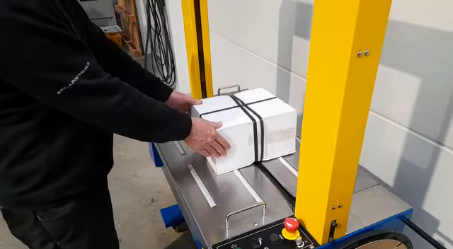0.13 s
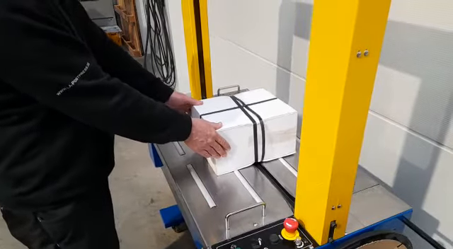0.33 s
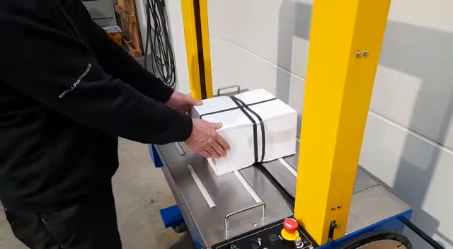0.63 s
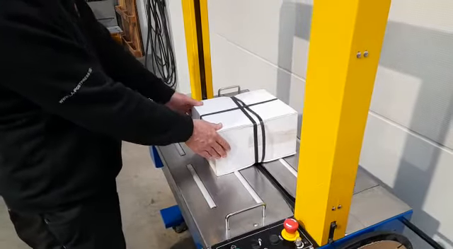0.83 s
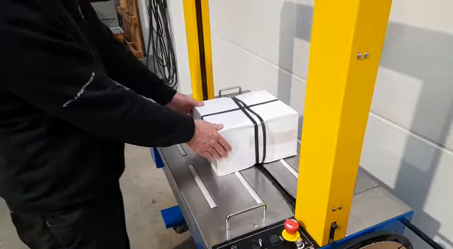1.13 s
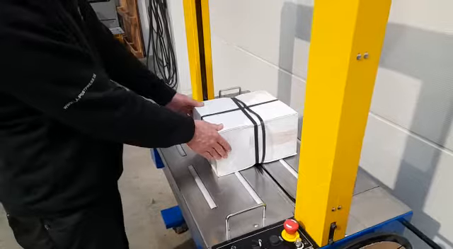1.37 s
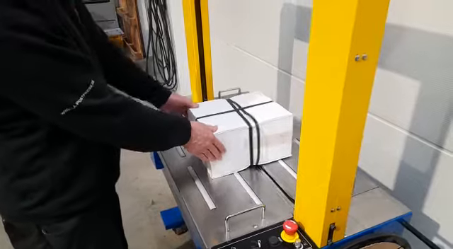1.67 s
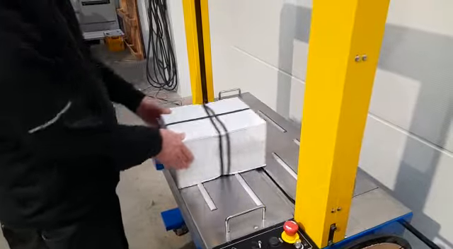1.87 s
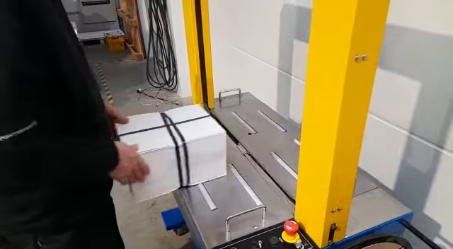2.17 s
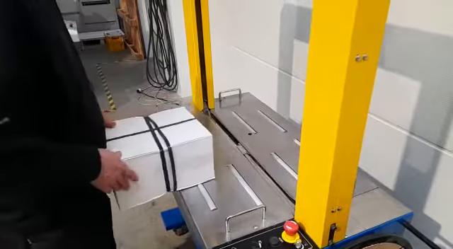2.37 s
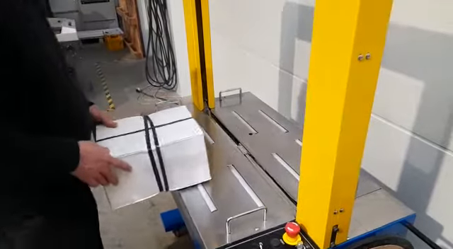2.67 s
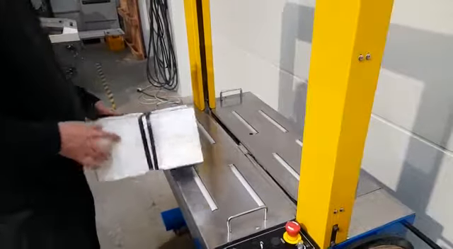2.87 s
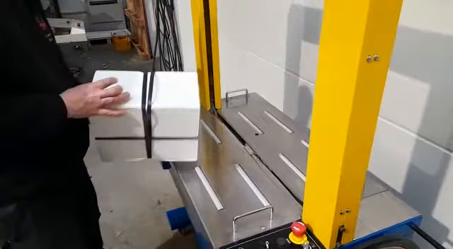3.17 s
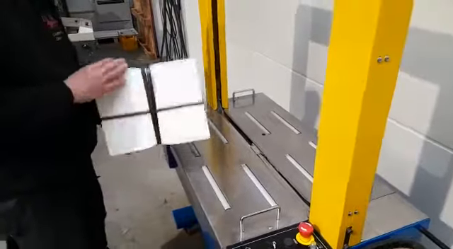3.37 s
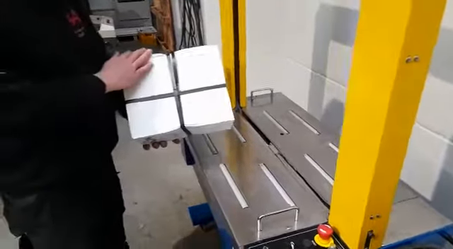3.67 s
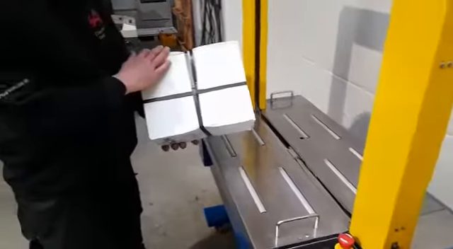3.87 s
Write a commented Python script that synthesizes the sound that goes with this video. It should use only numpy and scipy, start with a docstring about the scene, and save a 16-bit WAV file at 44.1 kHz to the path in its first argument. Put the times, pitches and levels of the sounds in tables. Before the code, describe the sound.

Close phone pickup of a strapping machine ending its cycle: cams and clamps clack, strap hisses and squeals, then feed wheels whir in rising, jittery surges while plastic strap ticks along guides, with workshop echo.

```python
"""A hard-walled workshop, where a strapping machine ends its cycle a metre or two from a phone.
Cams and clamps clack (noise bursts, ringing frame modes) over a gear rumble (wandering coloured noise);
the strap squeals while it is drawn tight (a sinking, wavering harmonic tone in hiss); then the feed wheel
whirs new strap through the arch in surges (a jittery tone coloured by resonances) while the strap end
ticks along the guides (noise bursts). Short metallic rings, workshop air, hum and an echo tail surround it."""
import sys
import numpy as np
from scipy import signal
from scipy.fft import rfft, irfft
from scipy.io import wavfile
from scipy.ndimage import uniform_filter1d, map_coordinates

SR = 44100
rng = np.random.default_rng(int(sys.argv[2]) if len(sys.argv) > 2 else 0)


def wav_out(sig):
    """Save sig, one row per channel (or a flat mono array), as 16-bit PCM at SR to the path in sys.argv[1]."""
    wavfile.write(sys.argv[1], SR, np.round(np.clip(np.atleast_2d(sig).T, -1, 1) * 32767).astype(np.int16))


N = 176400

# Surges of the feed wheels: time_s, whir_db, pitch_hz
FEED_SURGES = [(2.41, -42, 562), (2.445, -26, 677), (2.485, -21.5, 1003), (2.55, -34, 1147),
               (2.68, -50, 750), (2.71, -30, 638.5), (2.79, -32, 622.8), (2.835, -43, 600.6),
               (2.95, -25.5, 680), (2.99, -24, 960), (3.09, -30, 800), (3.15, -38, 649.2),
               (3.2, -29.5, 616), (3.265, -17.5, 983), (3.33, -18, 1080), (3.4, -25.5, 951),
               (3.46, -25, 761), (3.49, -19, 742.6), (3.57, -15.5, 1010), (3.65, -23.5, 1145),
               (3.72, -19, 1010), (3.76, -17, 920), (3.85, -23.5, 1000), (3.92, -23, 1205),
               (4, -18.5, 1296)]


def undb(db):
    """Level to amplitude: 20 dB is a factor of ten."""
    return 10 ** (np.asarray(db) / 20)


def curve(table, axis):
    """Piecewise-linear control: one column of a table interpolated over its times."""
    table = np.array(table)
    return np.interp(np.arange(N) / SR, table[:, 0], table[:, axis])


def unit(x):
    """Normalization to a root-mean-square value of one."""
    return x / np.sqrt(np.mean(x ** 2))


def shape(x, points):
    """Spectral colouring: gains interpolated over log frequency, falling 24 dB per octave outside."""
    hz = np.maximum(np.fft.rfftfreq(x.shape[-1], 1 / SR), 1)
    point_hz, point_db = np.array(points).T
    octaves_below = np.maximum(np.log2(point_hz[0] / hz), 0)
    octaves_above = np.maximum(np.log2(hz / point_hz[-1]), 0)
    gain_db = np.interp(np.log(hz), np.log(point_hz), point_db) - 24 * (octaves_below + octaves_above)
    return irfft(rfft(x) * undb(gain_db), x.shape[-1])


def pair(mid, other):
    """Interchannel coherence: left and right alike in the bass, apart in the treble."""
    alike_hz = 1420
    side = signal.lfilter(*signal.butter(1, alike_hz, "high", fs=SR), other)
    return np.array([mid + side, mid - side])


def hiss(points):
    """Extended source: coloured stereo noise, as from many spots spread across the machine."""
    return unit(shape(pair(*rng.standard_normal((2, N))), points))


def walk(rate_hz):
    """Slow random modulation: held random levels smoothed twice, with a spread near 1."""
    hold = int(SR / rate_hz)
    steps = np.repeat(rng.standard_normal(N // hold + 1), hold)
    return 1.2 * uniform_filter1d(uniform_filter1d(steps, hold), hold)[:N]


def bursts(times_s, levels_db, t60s_s, rises_s):
    """Impact envelopes: exponential rise and decay, overlapping blows adding in power."""
    power = np.zeros(N)
    for start_s, level_db, t60_s, rise_s in np.broadcast(times_s, levels_db, t60s_s, rises_s):
        i = int(start_s * SR)
        t = np.arange(min(N - i, SR // 2)) / SR
        blow = undb(level_db - 60 * t / t60_s) * (1 - np.exp(-t / rise_s))
        power[i:i + len(t)] += blow ** 2
    return np.sqrt(power)


def shop():
    """Ambient noise: wandering broadband air noise, with mains hum and a higher tone as sinusoids."""
    # Spectrum of the air noise: frequency_hz, density_db (per Hz)
    air_tone = [(40, -9), (65, -12.5), (180, -6.5), (389, -9.5), (848, -19.5), (1620, -36), (2770, -31),
                (15600, -41.5)]
    # Steady pitches of wandering level: pitch_hz, level_db
    hum_tones = [(100, -54), (1641, -57)]
    t = np.arange(N) / SR
    hum = sum(undb(db + 3.9 * walk(9)) * np.sin(2 * np.pi * hz * t) for hz, db in hum_tones)
    air_db = -48 + 1.02 * walk(4.253)
    return undb(air_db) * hiss(air_tone) + hum


def room():
    """Diffuse reverberation: an impulse response of noise, each octave dying at its own rate."""
    # Reverberation time of the workshop: frequency_hz, t60_s
    reverberation = [(100, 0.55), (1000, 0.88), (5000, 0.64), (15000, 0.15)]
    point_hz, point_t60_s = np.array(reverberation).T
    t = np.arange(SR) / SR
    fade_in = np.clip(t / 0.0006, 0, 1)
    tails = 0
    for hz in 60 * 2. ** np.arange(9):
        t60_s = np.interp(np.log(hz), np.log(point_hz), point_t60_s)
        band = shape(rng.standard_normal((2, SR)), [(hz / 1.3, 0), (hz * 1.245, 0)])
        decay_energy = t60_s * SR / np.log(1e6)
        tails = tails + band * undb(-60 * t / t60_s) * fade_in / np.sqrt(decay_energy)
    return pair(tails[0], tails[1])


def gears():
    """Amplitude-modulated noise: the drive rumbles unevenly while the cam shaft turns."""
    # Course of the rumble: time_s, level_db
    rumble = [(0, -49), (.33, -41.5), (.45, -37.5), (.85, -38.5), (1.02, -50.5), (1.25, -38), (1.7, -32),
              (2.3, -43), (4, -40.5)]
    # Spectrum of the rumble: frequency_hz, density_db (per Hz)
    rumble_tone = [(57, -5), (140, -8), (215, 3.5), (300, -2.5), (400, -10.5), (570, -6), (900, -12),
                   (1620, -17.5), (2400, -25.5), (4500, -30)]
    return undb(curve(rumble, axis=1) + 2.73 * walk(11)) * hiss(rumble_tone)


def clacks():
    """Impact and modal response: a bright crack, a rattle of the sheet-metal frame and a low thump."""
    # Blows of cams and clamps: start_s, level_db, thump_db and body_db (both re level), treble_t60_s, rise_ms
    blows = [(0.1425, -35.5, -16, 1.5, 0.14, 0.36), (0.182, -22, -15, -4.5, 0.039, 0.12),
             (0.401, -17.5, -18, -2, 0.12, 17), (0.515, -18.5, -21, 0.5, 0.16, 22),
             (0.665, -36.5, -11, -8, 0.11, 5.9), (0.852, -44, -14, -1, 0.059, 1.7),
             (0.9774, -36.5, -9, 0.5, 0.063, 1.1), (1.2484, -49, -23, 16, 0.071, .7),
             (1.267, -37, 9, 4, 0.049, 0.99), (1.298, -31.5, 9, 6.5, 0.38, 7.4),
             (1.3324, -15, -1, -5, 0.055, 0.25), (1.369, -22, -15, -28, 0.12, 0.3),
             (1.466, -32, 10, 4.5, 0.1, 5.9), (1.5473, -8.5, -17, -3.5, 0.09, 12.7),
             (2.045, -11, -15, -13.5, 0.064, 3.1)]
    # Resonances of the frame: frequency_hz, level_db, t60_s
    frame_modes = [(606.5, 11, 0.42), (1664, 14.5, 0.1), (2250, 12, 0.033)]
    # Spectrum of the crack: frequency_hz, density_db (per Hz)
    crack_tone = [(1750, -5), (2940, -14), (3530, -7.5), (6340, -11), (14100, -12.5), (15600, -17)]
    body_t60_s, thump_t60_s, ring_db = 0.12, 0.14, -3.5
    start_s, level_db, thump_db, body_db, treble_t60_s, rise_ms = np.array(blows).T
    rise_s = rise_ms / 1000

    crack = bursts(start_s, level_db, treble_t60_s, rise_s) * hiss(crack_tone)

    noise = pair(*rng.standard_normal((2, N)))
    ring = 0
    for hz, mode_db, t60_s in frame_modes:
        radius = undb(-60 / t60_s / SR)  # pole radius sets the decay per sample
        poles = [1, -2 * radius * np.cos(2 * np.pi * hz / SR), radius ** 2]
        ring = ring + undb(mode_db) * unit(signal.lfilter([1], poles, noise))
    rattle = hiss([(480, 0.5), (900, 3.5), (2200, -6)])
    shake = bursts(start_s, level_db + body_db, body_t60_s, rise_s)
    body = shake * (rattle + undb(ring_db) * unit(ring))

    thump = bursts(start_s, level_db + thump_db, thump_t60_s, 0.0024)
    thump = thump * hiss([(70, -3), (150, -2), (300, 8.5), (430, -3.5)])
    return crack + body + thump


def pings():
    """Free vibration: single steel parts ring briefly as decaying tones with a slight phase wander."""
    # Short metallic rings: start_s, level_db, pitch_hz, t60_s
    rings = [(.731, -27, 590, .09), (2.512, -22, 6400, .035), (2.532, -24, 3450, .06),
             (2.652, -17, 9800, .04)]
    t = np.arange(N) / SR
    total = 0
    for start_s, level_db, hz, t60_s in rings:
        tone = np.sin(2 * np.pi * hz * t + 0.46 * walk(400))
        total = total + bursts([start_s], [level_db], [t60_s], 0.0029) * tone
    return total


def slide():
    """Friction under tension: the slipping strap hisses and squeals, patchy and wavering, with overtones."""
    # Course of the slip: time_s, hiss_db, squeal_db (re hiss)
    slip = [(1.3, -43, -32), (1.5, -49.5, -30), (1.58, -28, -29), (1.7, -33, -16.5), (2.01, -30, -11),
            (2.05, -28, -30), (2.2, -46, -30), (2.4, -57.5, -40)]
    # Spectrum of the hiss: frequency_hz, density_db (per Hz)
    slip_tone = [(1790, 1), (3030, -14), (3610, -2.5), (8460, -4.5), (15600, -1)]
    # Levels of the squeal's harmonics from the fundamental up: level_db
    harmonics_db = [0, -1, -5, -6]
    squeal_hz, sag_hz_per_s, wander_share = 3850, 500, 0.009
    t = np.arange(N) / SR
    start_s = slip[0][0]
    slip_db = curve(slip, axis=1) - 80 * (t < start_s)  # all but silent before the slip

    pitch_hz = squeal_hz - sag_hz_per_s * (t - start_s)  # sinks as the strap tightens
    wander = wander_share * (walk(14) + 2.6 * walk(400))
    phase = 2 * np.pi * np.cumsum(pitch_hz * (1 + wander)) / SR
    squeal = 0
    for order, db in enumerate(harmonics_db, start=1):
        squeal = squeal + undb(db + 6 * walk(55)) * np.sin(order * phase)

    rub = undb(slip_db + 0.89 * walk(37.6)) * hiss(slip_tone)
    return rub + undb(slip_db + curve(slip, axis=2)) * squeal


def buzz():
    """Periodic excitation: knurls passing at strap speed give a jittery, fluttering tone and its octave."""
    # Spread of the pitch until the wheels settle: time_s, spread (share of the pitch)
    jitter = [(2.4, .15), (3.45, .13), (3.6, .045)]
    flutter_db, octave_db = 4.5, -6.5
    pitch_hz = curve(FEED_SURGES, axis=2) * (1 + curve(jitter, axis=1) * walk(250))
    phase = 2 * np.pi * np.cumsum(pitch_hz) / SR
    fundamental = undb(flutter_db * walk(90)) * np.sin(phase)
    octave = undb(octave_db + flutter_db * walk(90)) * np.sin(2 * phase)
    return fundamental + octave


def feed():
    """Source and resonator: wheels buzz and roar in surges through the arch; strap rasps and ticks in guides."""
    # Course of the rasp: time_s, level_db
    rasp = [(2.42, -45), (2.5, -36.5), (2.53, -35.5), (2.65, -48.5), (2.85, -46), (3.4, -32.5), (4, -30.5)]
    # Spectrum of rasp and ticks: frequency_hz, density_db (per Hz)
    rasp_tone = [(2430, -10), (5540, -7), (7370, -12), (9890, -8.5), (11100, -10), (13300, -5),
                 (15600, -9.5)]
    # Resonances of the strap arch: frequency_hz, density_db (per Hz)
    arch = [(500, -3.5), (620, 2.5), (770, -2), (1000, -0.5), (1350, -7), (1600, -8.5), (2000, -6.5),
            (2350, -16.5)]
    # Ticks of the strap end: start_s, level_db
    tick_blows = [(2.4335, -25), (2.4555, -23), (2.514, -16.5), (2.74, -18.5), (2.8036, -23), (2.8864, -23),
                  (2.932, -21), (2.98, -17), (3.046, -19), (3.092, -20), (3.1806, -34), (3.219, -19),
                  (3.2679, -19), (3.306, -13), (3.356, -17), (3.4694, -36), (3.5126, -19), (3.5508, -15.5),
                  (3.5912, -16), (3.6311, -33), (3.6879, -23.5), (3.7949, -46), (3.884, -25)]
    roar_db, tick_t60_s, rebound_s, rebound_db = -9, 0.037, 0.011, -2
    on = np.arange(N) / SR > rasp[0][0]

    wheels = shape(pair(buzz(), buzz()), arch) + undb(roar_db) * hiss(arch)
    whir = undb(curve(FEED_SURGES, axis=1)) * wheels

    start_s, level_db = np.array(tick_blows).T
    times_s = np.r_[start_s, start_s + rebound_s]  # each tick is followed by a rebound
    levels_db = np.r_[level_db, level_db + rebound_db]
    ticks = bursts(times_s, levels_db, tick_t60_s, 0.0032)
    rasp_level = undb(curve(rasp, axis=1) + 2.8 * walk(150))
    strap = np.hypot(rasp_level, ticks) * hiss(rasp_tone)  # powers add
    return on * (whir + strap)


def late(x, lag_s):
    """Propagation delay: shift by a fraction of a sample; a negative lag advances."""
    return map_coordinates(x, [np.arange(N) - lag_s * SR], mode="nearest")


def scene():
    """Superposition: direct sound with interchannel delays, plus reverberation and ambient noise."""
    cams_lag_s, feed_lag_s = -0.000057, 0.00015  # the cams reach the left port first, the feed reaches it after the right
    echo_db, left_re_right_db = -6, 0.5
    cams = clacks() + gears()
    strap = feed()
    ahead = slide() + pings()
    left = late(cams[0], cams_lag_s) + late(strap[0], feed_lag_s)
    right = cams[1] + strap[1]
    direct = np.array([left, right]) + ahead
    source = (cams + strap).mean(axis=0, keepdims=True)
    echo = signal.fftconvolve(source, room(), axes=1)[:, :N]
    balance = undb([[left_re_right_db / 2], [-left_re_right_db / 2]])
    return (direct + undb(echo_db) * echo + shop()) * balance


def record(dry):
    """Band limiting: the bass rolls off below about 50 Hz and nothing above about 15.75 kHz is kept."""
    low_hz, top_hz = 50, 15750
    thin = signal.lfilter(*signal.butter(2, low_hz, "high", fs=SR), dry)
    return signal.sosfilt(signal.ellip(10, .2, 70, top_hz, fs=SR, output="sos"), thin)


dry = scene()
out = record(dry)
wav_out(out)
```